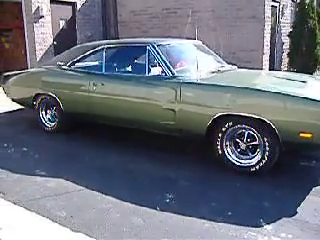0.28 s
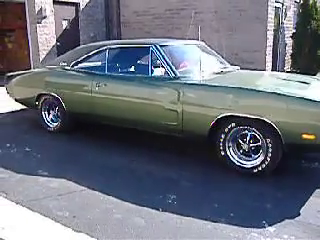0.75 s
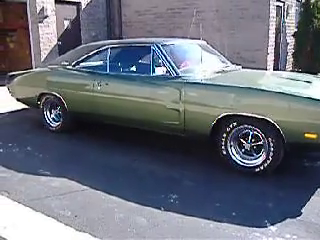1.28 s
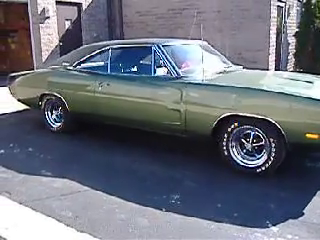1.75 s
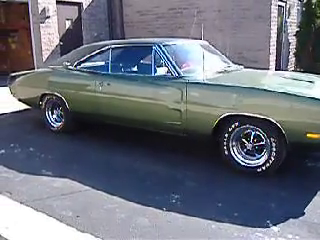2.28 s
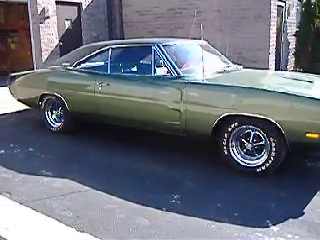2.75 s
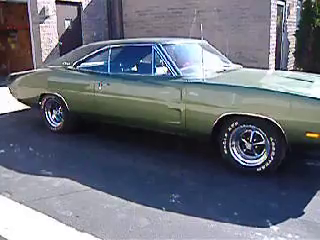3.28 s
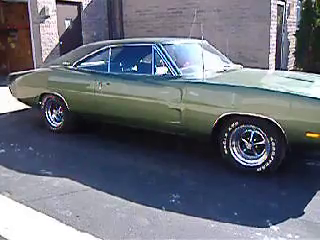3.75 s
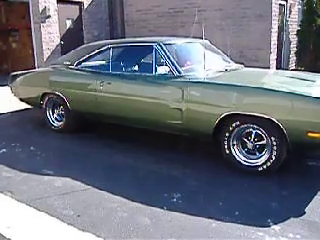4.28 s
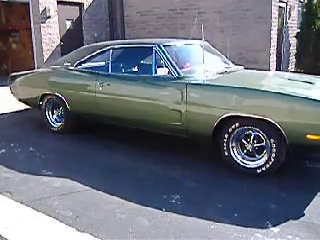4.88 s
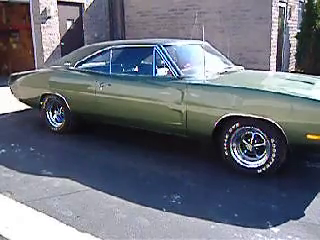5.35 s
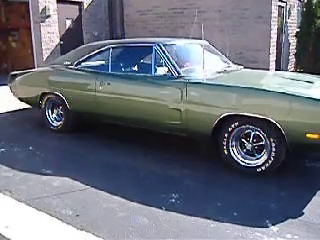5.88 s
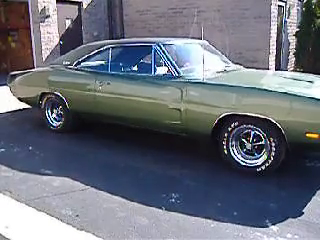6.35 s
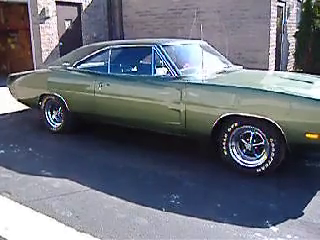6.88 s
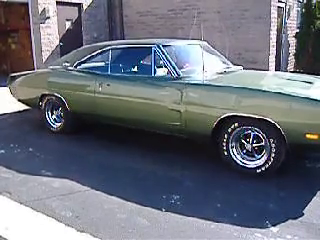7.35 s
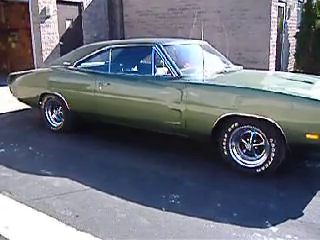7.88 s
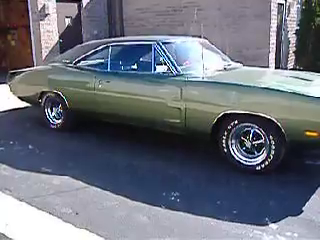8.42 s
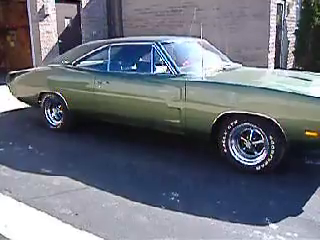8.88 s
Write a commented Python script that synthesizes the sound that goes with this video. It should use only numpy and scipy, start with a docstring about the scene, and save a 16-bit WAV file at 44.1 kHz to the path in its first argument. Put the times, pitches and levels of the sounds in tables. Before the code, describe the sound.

Quiet outdoor driveway with low far traffic rumble, sparse faint birds and thin camera hiss and whine. A car door latch knocks dully, twice. Then a starter clanks and grinds, squeals, and a big V8 catches, blips into a deep throaty roar and dies as the starter whines down. After a short pause the same start and stall repeats. A modest camera microphone, close by, dull at the very top.

```python
"""Two starts of a big V8

A big V8 parked on a drive is started twice: the starter clashes in and grinds, the engine catches,
blips up and dies, and the starter coasts down. Before that a door latch knocks. Pulses and noise make
the engine, ringing noise the starter and door, and gliding tones the squeals and small birds.
Far traffic is filtered noise, and the camera's own electronics hiss and whine."""
import sys
import numpy as np
from scipy import signal
from scipy.fft import rfft, irfft, next_fast_len
from scipy.io import wavfile
from scipy.ndimage import uniform_filter1d, map_coordinates

SR = 44100
rng = np.random.default_rng(int(sys.argv[2]) if len(sys.argv) > 2 else 0)


def persist_wave(psi):
    """Save psi, clipped to +-1, as 16-bit WAV."""
    counts = np.round(np.clip(psi, -1, 1) * 32767).astype(np.int16)
    wavfile.write(sys.argv[1], SR, np.atleast_2d(counts).T)


N = 403074
T = np.arange(N) / SR  # time of each sample (s)

# when each start may shake the panels: (from t/s, to t/s)
STARTS = [(4.22, 6.4), (7.15, 9.14)]
# when the engine fires: (from t/s, to t/s)
FIRING = [(4.3, 5.75), (7.25, 8.7)]
# when the starter and its gears can be heard, from engaging to the end of the coast-down: (from t/s, to t/s)
STARTER_HEARD = [(4.29, 6.15), (7.23, 9.14)]
# crankshaft speed, one list for each start: (t/s, firing rate f/Hz)
CRANKSHAFT = [
    [(4.3, 26.9), (4.66, 43.2), (4.75, 50.3), (4.82, 82.5), (4.9, 87), (5.15, 73.4), (5.3, 47.6),
     (5.5, 33.5), (5.8, 22.6)],
    [(7.2, 24.8), (7.7, 39.8), (7.76, 49.5), (7.86, 92), (7.95, 79), (8.05, 63.4), (8.4, 47), (8.6, 29.5),
     (9.1, 19)],
]
# average strength of each firing at the tail pipes, in firing order: (level/dB)
CYLINDERS = [-4, -2, -9, -15.5, -8.5, -3.5, -5.5, -7]
# exhaust, one list for each start: (t/s, thump level/dB, bark level/dB)
EXHAUST = [
    [(4.3, -27, -45), (4.37, -36, -27.5), (4.53, -39, -35.5), (4.61, -26.5, -36.5), (4.65, -31, -35),
     (4.69, -19, -36), (4.74, -15.5, -24), (4.9, -15, -18.5), (4.96, -20.5, -19.5), (5.15, -22.5, -25.5),
     (5.3, -27.5, -30), (5.5, -33.5, -32.5), (5.75, -39, -41)],
    [(7.25, -34, -53), (7.3, -31, -29.5), (7.4, -35, -36), (7.56, -38, -36), (7.61, -29, -35),
     (7.706, -34, -40), (7.746, -16, -32), (7.8, -15, -19), (7.9, -17.5, -16.5), (8.01, -19.5, -23),
     (8.2, -24, -28), (8.54, -31.5, -38), (8.7, -38, -39)],
]
# colour of the deep exhaust thump: (f/Hz, level/dB)
THUMP_COLOUR = [(15, -37.5), (30, 2.5), (50, -2), (85, -3), (130, -9), (220, -36), (400, -120)]
# colour of the rougher exhaust bark: (f/Hz, level/dB)
BARK_COLOUR = [(70, -39), (120, 3.5), (170, 0), (250, -8.5), (340, -6.5), (430, -12.5), (550, -19.5),
               (700, -13.5), (900, -18.5), (1300, -58)]
# clean tones of the crank: (multiple of the firing rate, level/dB)
CRANK_TONES = [(.5, -8), (1, 0), (1.5, -13), (2, -12), (3, -16)]
# body and pipe tones that swell and ring out: (top t/s, f/Hz, level/dB, 20 dB rise t/s, 60 dB fall t/s)
PANELS = [(4.37, 143, -35.5, .05, 3), (4.47, 199.7, -36, .1, 0.51), (4.88, 74.6, -21, 0.13, .6),
          (4.88, 199.7, -28.5, .1, 1.2), (4.88, 291.7, -29, 0.13, 2.6), (4.9, 379.6, -25.5, 0.2, 1.01),
          (4.971, 143, -31.5, .08, 1.6), (5.21, 74.6, -23, 0.074, .5), (5.28, 143, -34, .1, .5),
          (5.6, 199.7, -35, 0.034, 2.9), (5.89, 143, -39, .6, 1.2), (6.06, 74.6, -36.5, .5, 3.9),
          (7.31, 143, -29, .03, 1.2), (7.6, 142.2, -38, 0.24, 1), (7.43, 74.6, -37, 0.072, .6),
          (7.65, 74.6, -31.5, 0.18, 1), (7.85, 199.7, -24, 0.064, 1.8), (7.89, 379.6, -23.5, 0.1, 0.41),
          (7.95, 143, -31.5, .2, 1.1), (8.01, 291.7, -25, .1, 2.16), (8.159, 74.6, -29.5, .2, 0.93),
          (8.39, 143, -35.5, .15, 2.1)]
# starter, one list for each start: (t/s, housing level/dB, mesh level/dB, rasp level/dB, hiss level/dB)
GEARS = [
    [(4.29, -52, -59, -67, -70), (4.304, -60, -62, -59, -59), (4.33, -33, -27.5, -35, -33),
     (4.352, -22.5, -24, -32, -28.5), (4.392, -26.5, -34.5, -31.5, -43), (4.532, -26.5, -30.5, -33, -43),
     (4.662, -28.5, -34.5, -35, -48), (4.708, -34, -31.5, -35, -29.5), (4.714, -37, -37.5, -34, -32),
     (4.874, -32.5, -34, -32.5, -31), (4.962, -36, -35.5, -40, -43.5), (5.134, -33, -34.5, -40, -41),
     (5.264, -34, -38.5, -44, -44.5), (5.76, -51.5, -45.5, -48, -50.5), (5.942, -45, -48.5, -53.5, -57),
     (6.138, -58, -59, -60, -67), (6.15, -53, -64, -72, -61)],
    [(7.23, -59, -60, -73, -61), (7.24, -59, -64, -63, -65), (7.266, -23, -28, -32.5, -34.5),
     (7.356, -30.5, -37.5, -40.5, -44.5), (7.378, -39, -45, -48, -54), (7.394, -41, -43, -53, -43),
     (7.426, -43, -46, -56, -58), (7.48, -30, -39, -50, -55), (7.516, -30, -32, -40, -48.5),
     (7.65, -27, -33.5, -34, -42.5), (7.756, -30, -38, -34.5, -41), (7.766, -35.5, -37, -37, -27),
     (7.808, -36, -33.5, -34, -30.5), (7.964, -39, -34.5, -41.5, -41.5), (8.506, -41, -40.5, -44, -45.5),
     (8.984, -51, -45.5, -49, -53.5), (9.14, -49, -52, -52, -59)],
]
# colour of the gear grind: (f/Hz, level/dB)
GRIND_COLOUR = [(260, -23.5), (450, -7), (550, -9), (823, 2.5), (1170, 3), (1450, -9.5), (1790, 0.5),
                (2400, -12), (2860, -10), (3410, -17.5), (3960, -14.5), (4910, -17.5), (7430, -16),
                (8220, -21), (9090, -44), (11800, -73), (20000, -120)]
# ringing tones of the starter and bell housing: (f/Hz, width f/Hz, level/dB)
HOUSING = [(693, 100, 1), (799, 59, 0), (995, 33, 0.5), (1178, 120, 1), (1718, 110, -3.5), (1817, 37, -4),
           (2107, 41, -6), (2310, 72, -11), (2747, 55, -12.5), (3193, 100, -13.5), (3840, 50, -17),
           (4080, 96, -17), (4243, 51, -16), (4570, 67, -15), (5050, 120, -19.5), (5670, 170, -12.5),
           (6560, 100, -44)]
# hard gear contacts: (t/s, starting level/dB, relative treble level/dB)
CLANKS = [(4.3264, -25, -9), (4.3403, -32, -14), (4.699, -21.5, 2), (4.7324, -32, -14), (4.9238, -25, -4),
          (4.961, -33, -7), (5.1907, -18.5, -14), (7.2605, -21, -6), (7.4956, -26, -33), (7.538, -28, -21),
          (7.7653, -29, 0), (7.993, -19, -6.5), (8.3424, -27, -13)]
# short squeals of the starter, while it cranks and as it coasts down:
# (t/s, length t/s, from f/Hz, to f/Hz, level/dB)
SQUEALS = [(4.39, .16, 4040, 3980, -36), (4.51, 0.072, 1014, 1012, -20), (5.55, .04, 2001, 1998, -38),
           (5.62, .06, 1755, 1720, -38), (4.635, .025, 2720, 2750, -31), (7.385, 0.045, 2048, 1990, -39),
           (7.385, 0.0163, 6030, 5900, -38), (7.6, .08, 1163, 995, -22), (7.605, 0.037, 2277, 2310, -27.5),
           (7.63, 0.026, 3280, 3180, -34.5), (7.675, 0.018, 3200, 3240, -31), (7.69, 0.02, 4800, 4650, -33),
           (7.7, 0.016, 2150, 2060, -27), (7.762, 0.014, 5700, 5530, -31)]
# when the freed armature, the spinning core of the starter, starts to be heard: (t/s)
COAST = [5.505, 8.7]
# bands of the housing that the coasting whine excites: (f/Hz, width f/Hz, level/dB)
FLARES = [(2130, 110, -3), (1780, 150, 1), (1200, 130, 0), (1030, 120, -5)]
# door latch knocks: (t/s, level/dB, rattle relative to the knock level/dB)
KNOCKS = [(2.296, -21.5, -21), (2.319, -25, -25.5), (2.627, -36, 4), (2.652, -19, -32), (2.674, -27.5, -26)]
# ringing tones of the door: (f/Hz, average level/dB, 60 dB fall t/s)
DOOR_TONES = [(317, -13, .15), (416, -1, 0.11), (623, -1.5, 0.05), (817, -11, 0.075), (935, -19, .1)]
# colour of the dull door thud: (f/Hz, level/dB)
SKIN_COLOUR = [(50, -30), (120, 11), (250, -0.5), (500, -3.5), (800, -7), (1200, -18.5), (2200, -30),
               (4000, -43)]
# colour of the latch rattle: (f/Hz, level/dB)
LATCH_COLOUR = [(900, -26), (2000, -6), (2900, -6.5), (4200, -3), (5500, -6), (7500, -7), (9200, -23)]
# bird calls: (t/s, length t/s, from f/Hz, to f/Hz, level/dB)
BIRDS = [(.04, 0.21, 2880, 2960, -54), (.62, .19, 2120, 2230, -54.5), (1.36, .012, 3500, 3150, -53),
         (1.435, .014, 4860, 4700, -54), (1.452, .014, 4300, 4050, -55), (1.53, .025, 3800, 3050, -59),
         (1.468, .015, 3300, 3050, -52), (1.58, 0.016, 3300, 3060, -53), (1.68, .028, 4230, 3000, -58),
         (3.645, 0.044, 5070, 4330, -53.5), (6.02, 0.05, 5000, 4130, -53), (6.18, .03, 4200, 3240, -53),
         (7.02, .03, 4700, 4100, -54)]
# slow course of the far traffic rumble: (t/s, level/dB)
STREET = [(0.2, -32.5), (1.0, -35), (1.8, -35.5), (2.7, -32), (3.4, -33.5), (4.0, -34), (6.4, -33),
          (7.1, -35), (9, -33)]
# colour of the rumble: (f/Hz, level/dB)
RUMBLE_COLOUR = [(7.1, -42.5), (12, -9), (32, -5), (49, -4), (81, -2.5), (124, -11.5), (147, -14),
                 (177, -18.5), (250, -21.5), (320, -39), (550, -120)]
# colour of the tyre roar: (f/Hz, level/dB)
ROAR_COLOUR = [(110, -34.5), (180, -3.5), (300, -5.5), (445, -7.5), (600, -9), (800, -5), (950, -7),
               (1100, -15), (1450, -18), (1750, -16.5), (2050, -23.5), (2300, -38), (3000, -51)]
# faint far hum: (f/Hz, average level/dB)
HUM = [(361.6, -58), (485.8, -56.5), (769, -58), (976, -62.5)]
# times when the hum swells: (top t/s, f/Hz, level/dB, 20 dB rise t/s, 60 dB fall t/s)
HUM_SWELLS = [(1.06, 474, -50, .2, 2), (2.34, 479.6, -43, 0.17, 4.4), (3.35, 482.5, -43.5, 0.93, 1.8),
              (3.72, 977, -47.5, 0.54, 0.92), (6.2, 479, -50, 0.5, 2.4), (6.4, 992, -46, 0.3, 1.8),
              (8.6, 487.9, -50.5, .2, 1.77)]
# colour of the preamp hiss: (f/Hz, level/dB)
HISS_COLOUR = [(1200, -43), (2200, 2), (4000, 0.5), (6000, -2), (7500, 6), (8500, -16), (9200, -26.5)]
# camera whine before the top cut: (line f/Hz, pitch between jumps above the line f/Hz, level/dB)
WHINE = [(7289.91, 31, -46.5), (7011.85, 1, -58.5), (8643.84, 29, -68)]

ROUGH_STALLED, ROUGH_FLAT_OUT, FLAT_OUT_HZ = .5, .08, 90  # firing scatter (0-1) falls as firing speeds up
STUMBLE_DB = 1.2  # typical random swing of the exhaust level
CLANK_LOW_DB, CLANK_T60 = -7, 0.03  # low end of a clank (dB); its 60 dB fall time (s)
STRAYS_PER_S, STRAY_DB = 5, -7  # lesser gear contacts a second; their level against the housing (dB)
COAST_HZ, SAG_HZ_PER_S, COAST_S = 2450, 3150, .5  # average starting pitch, its fall a second, length (s)
COAST_DB = -38  # coasting whine before the housing flares
ROAR_DB, SURGE_DB = -41.5, 1  # tyre roar level; typical random swing of the rumble
SLIPS_HZ, TOP_HZ = 66.24, 9250  # phase jumps of the whine a second; hard top limit for sound and hiss (Hz)


def firings():
    """Each firing gives one pulse, uneven by cylinder and luck, and opens a gate that soon shuts."""
    rate, = curves(*CRANKSHAFT)
    rough = np.interp(rate, [0, FLAT_OUT_HZ], [ROUGH_STALLED, ROUGH_FLAT_OUT])
    turns = np.cumsum(rate) / SR  # running count of firings
    count = np.arange(1, int(turns[-1]))
    luck = rng.standard_normal((1000, 2))[:len(count)]
    at = np.searchsorted(turns, count)
    late = luck[:, 0] * rough[at] * SR / rate[at]
    at = np.clip(at + late.astype(int), 0, N - 1)
    strength_db = np.resize(CYLINDERS, len(count)) + 4.5 * rough[at] * luck[:, 1]
    pulses = np.bincount(at, amp(strength_db), N)
    gate = signal.fftconvolve(pulses, amp(-60 * T[:SR // 10] / 0.034))[:N]
    return turns, pulses, gate


def engine(turns, pulses, gate):
    """Firings thump and bark through the pipes, while body and pipe tones swell and ring out."""
    thump_db, bark_db = curves(*EXHAUST)
    tones = sum(amp(db + 2.1 * wobble(10)) * np.sin(2 * np.pi * (order * turns + rng.random()))
                for order, db in CRANK_TONES)
    thump = level(.45 * level(coloured(pulses, THUMP_COLOUR), .1) + 1.3 * tones, .06)
    # turbulent gas follows each pulse
    turbulence = unit((3.3 + level(gate, 0.083)) * rng.standard_normal(N))
    gas = unit(pulses) + 1.2 * turbulence
    bark = level(coloured(.4 * gas + echoed(gas, .08), BARK_COLOUR), .06)
    panels = sum(swell(s, db, rise, t60) * wavering(hz, waver=.012, flutter_db=1.5)
                 for s, hz, db, rise, t60 in PANELS)
    thump = amp(thump_db + STUMBLE_DB * wobble(19)) * thump
    bark = amp(bark_db + STUMBLE_DB * wobble(15)) * bark
    return running(FIRING) * (thump + bark) + running(STARTS) * panels


def echoed(x, t60):
    """Ground, floor pan and wall throw sound back in a short dense tail, drawn anew every fifth of a second."""
    hop, out = SR // 5, np.zeros(N + SR)
    for i in range(0, N, hop):
        tail = rng.standard_normal(hop) * amp(-60 * T[:hop] / t60)
        piece = signal.fftconvolve(x[i:i + hop], tail / np.linalg.norm(tail))
        out[i:i + len(piece)] += piece
    return out[:N]


def starter(gate):
    """Gear teeth rattle the housing; each ringing tone swells by itself; firings shake the rattle."""
    teeth = rng.standard_normal(N) * amp(1.38 * wobble(300) + 0.49 * wobble(40))
    teeth = teeth * (3 + .15 * level(gate, .1))
    modes = sum(amp(db + 3.4 * wobble(22)) * narrow(hz, width) for hz, width, db in HOUSING)
    grind = unit(filtered(teeth, shape(GRIND_COLOUR))) + 0.76 * unit(modes)
    # three low-pass copies; their differences split the grind into four bands
    low, mid, high = (filtered(grind, lambda f: 1 / (1 + (f / hz) ** 8)) for hz in (1450, 3000, 5300))
    puffs = 4 + .5 * level(gate, .1)  # escaping gas hisses at each firing
    bands = low, mid - low, high - mid, (grind - high) * puffs
    levels_db = curves(*GEARS)
    sound = sum(amp(db + 1.06 * wobble(25)) * level(band, 0.1) for db, band in zip(levels_db, bands))
    return running(STARTER_HEARD) * sound + clanks(levels_db[0])


def clanks(housing_db):
    """Gear contacts are short bursts of coloured noise; lesser ones fall at random times."""
    out, t = np.zeros(N + SR), T[:SR // 10]
    strays = []
    for start, end in STARTER_HEARD:
        for u in rng.random(round(STRAYS_PER_S * (end - start))):
            s = start + u * (end - start)
            strays.append((s, housing_db[round(s * SR) - 1] + STRAY_DB, -13))
    for s, db, high_db in CLANKS + strays:
        tilt = [(400, CLANK_LOW_DB - 16.0), (900, CLANK_LOW_DB), (2200, -13),
                (6000, high_db - 12.5), (8200, high_db - 12.5), (9200, high_db - 47)]
        blow = burst(t, tilt) * amp(-60 * t / CLANK_T60)
        out[round(s * SR):][:len(t)] += amp(db) * blow
    return out[:N]


def coasting():
    """The armature whines down, unsteady, and flares where it crosses a band that the housing radiates."""
    out = np.zeros(N)
    for s in COAST:
        hz = COAST_HZ - SAG_HZ_PER_S * np.clip(T - s, 0, COAST_S)
        flare = sum(amp(db) / (1 + ((hz - mid_hz) / width * 2) ** 2) for mid_hz, width, db in FLARES)
        tone = np.sin(2 * np.pi * np.cumsum(hz * (1 + .01 * wobble(60))) / SR)
        out += running([(s, s + COAST_S)]) * amp(COAST_DB + 2.5 * wobble(40)) * flare * tone
    return out


def squeals():
    """The starter squeals while it cranks and as it coasts down, in short tones that glide and waver."""
    return chirps(SQUEALS, waver=.01)


def door():
    """Each knock rings the door skin at new strengths and rattles the latch."""
    out, t = np.zeros(N + SR), T[:SR // 2]
    for s, db, rattle_db in KNOCKS:
        ring = sum(amp(g + rng.normal(0, 3) - 60 * t / t60) * np.sin(2 * np.pi * hz * t)
                   for hz, g, t60 in DOOR_TONES)
        thud = 0.81 * burst(t, SKIN_COLOUR) * amp(-60 * t / 0.31)
        rattle = burst(t, LATCH_COLOUR) * amp(rattle_db - 60 * t / 0.13)
        onset = 1 - np.exp(-t / 0.0011)
        out[round(s * SR):][:len(t)] += amp(db) * (ring + thud + rattle) * onset
    return out[:N]


def birds():
    """Small birds call in brief whistles that glide and waver."""
    return chirps(BIRDS, waver=.006)


def street():
    """Far traffic is a lumpy noise rumble under a smoother tyre roar, with a hum of narrow noise bands."""
    rumble_db, = curves(STREET)
    rumble = unit(filtered(rng.standard_normal(N), shape(RUMBLE_COLOUR)) * amp(0.67 * wobble(6)))
    roar = unit(filtered(rng.standard_normal(N) * amp(1.0 * wobble(11)), shape(ROAR_COLOUR)))
    hum = sum(amp(db + 3 * wobble(3.1)) * level(narrow(hz, width=5.5), .3) for hz, db in HUM)
    hum += sum(swell(s, db, rise, t60) * level(narrow(hz, width=5), 0.33)
               for s, hz, db, rise, t60 in HUM_SWELLS)
    return amp(rumble_db + SURGE_DB * wobble(2.5)) * rumble + amp(ROAR_DB) * roar + hum


def chirps(rows, waver):
    """Gliding sines under a rounded swell, wavering in pitch and level."""
    out, drift = np.zeros(N), np.cumsum(waver * wobble(70)) / SR
    flutter = amp(2.5 * wobble(80))
    for s, length, from_hz, to_hz, db in rows:
        u = np.clip((T - s) / length, 0, 1)  # progress through the call
        turns = length * u * (from_hz + (to_hz - from_hz) * u / 2) + from_hz * drift
        out += amp(db) * np.sin(np.pi * u) ** 0.47 * np.sin(2 * np.pi * turns)
    return out * flutter


def burst(t, colour):
    """Coloured noise as long as t, scaled to rms 1."""
    return unit(coloured(rng.standard_normal(len(t)), colour)[:len(t)])


def narrow(hz, width):
    """Noise ringing in one resonance."""
    return unit(filtered(rng.standard_normal(N), lambda f: 1 / (1 + ((f - hz) / width * 2) ** 2)))


def wavering(hz, waver, flutter_db):
    """A sine that drifts a little in pitch and level, around rms 1."""
    turns = hz * np.cumsum(1 + waver * wobble(15)) / SR
    return np.sqrt(2) * amp(flutter_db * wobble(18)) * np.sin(2 * np.pi * turns)


def swell(s, db, rise, t60):
    """Gain that climbs 20 dB in rise seconds to its top, then falls 60 dB in t60 seconds."""
    return amp(db - np.maximum(20 * (s - T) / rise, 60 * (T - s) / t60))


def amp(db):
    """Decibels to gain."""
    return 10 ** (np.asarray(db) / 20)


def unit(x):
    """Scaled to rms 1."""
    return x / np.sqrt(np.mean(x ** 2) + 1e-20)


def level(x, seconds):
    """x with its slow level divided out."""
    return x / np.sqrt(np.abs(uniform_filter1d(x ** 2, int(seconds * SR))) + 1e-12)


def curves(*tables):
    """One value per sample for each column after the time."""
    s, *cols = np.transpose(np.concatenate(tables))
    return [np.interp(T, s, c) for c in cols]


def running(spans):
    """1 inside the spans, with soft ends."""
    return uniform_filter1d(sum((T > a) & (T < b) for a, b in spans) * 1., 1500)


def wobble(rate):
    """A smooth random curve through rate random points a second."""
    return map_coordinates(rng.standard_normal(int(N * rate / SR) + 4), [T * rate])


def filtered(x, response):
    """x with its spectrum multiplied by a response of frequency."""
    m = next_fast_len(N + SR // 2)
    return irfft(rfft(x, m) * response(np.fft.rfftfreq(m, 1 / SR)), m)[..., :N]


def shape(points):
    """Gain at any frequency, from (f/Hz, level/dB) points joined on a log axis."""
    f, db = np.transpose(points)
    return lambda hz: amp(np.interp(np.log(hz + 1), np.log(f + 1), db, left=-120, right=-120))


def coloured(x, points):
    """Colour that never sounds before its cause: the minimum-phase filter of the points."""
    size = 8192
    c = irfft(np.log(shape(points)(np.fft.rfftfreq(size, 1 / SR)) + 1e-5), size)
    # folding the log spectrum's transform onto its first half gives minimum phase
    c[1:size // 2] *= 2
    c[size // 2 + 1:] = 0
    return signal.fftconvolve(x, irfft(np.exp(rfft(c)), size))[:N]


def scene():
    """All sources at one microphone."""
    turns, pulses, gate = firings()
    car = engine(turns, pulses, gate) + starter(gate) + coasting() + squeals() + door()
    return (car + birds() + street())[None]


def record(dry):
    """The input stage rounds off peaks; hiss, whine and a small offset join; steep filters cut the top."""
    inside = T * SLIPS_HZ % 1  # progress from one phase jump to the next
    whine = sum(amp(db + 3) * np.sin(2 * np.pi * (hz * T + above * (inside - .5) / SLIPS_HZ))
                for hz, above, db in WHINE)
    hiss = amp(-54) * unit(filtered(rng.standard_normal(N), shape(HISS_COLOUR)))
    soft = dry / (1 + np.abs(dry / .5) ** 4) ** (1 / 4)
    sound = filtered(soft + hiss, lambda hz: 1 / (1 + (hz / 8800) ** 40) * (hz < TOP_HZ))
    whine = filtered(whine, lambda hz: 1 / (1 + (hz / 8740) ** 150))
    return sound + whine - .0039


dry = scene()
out = record(dry)
persist_wave(out)
```